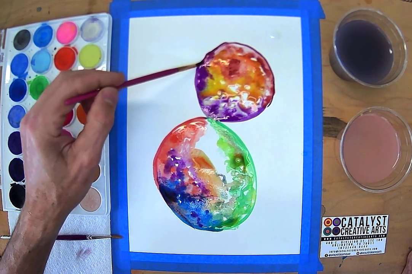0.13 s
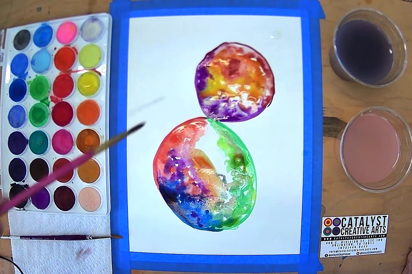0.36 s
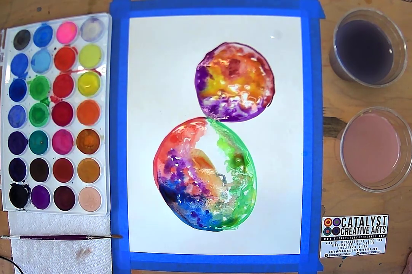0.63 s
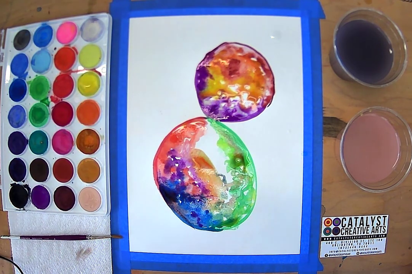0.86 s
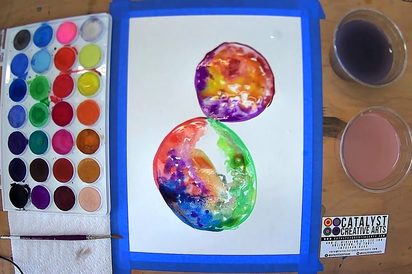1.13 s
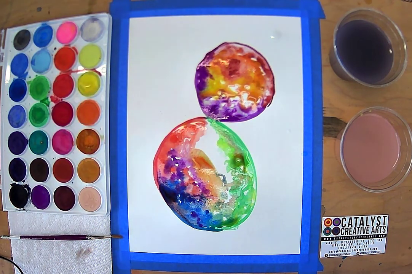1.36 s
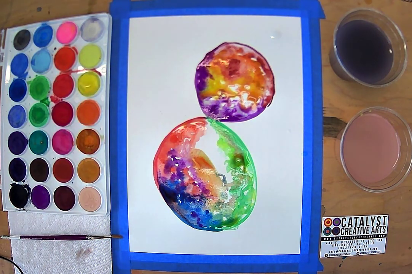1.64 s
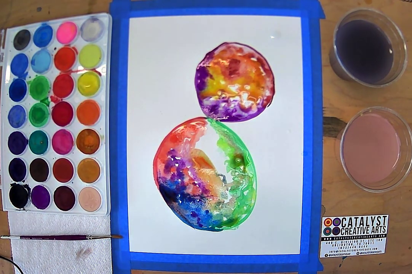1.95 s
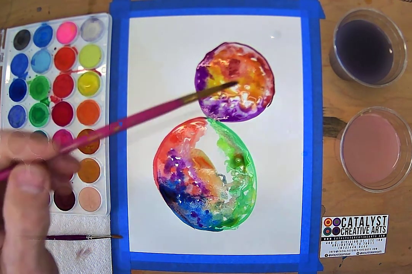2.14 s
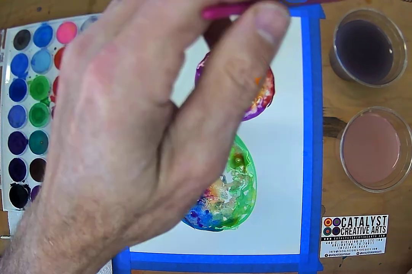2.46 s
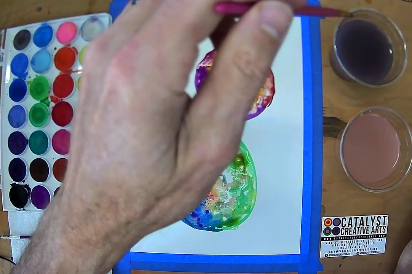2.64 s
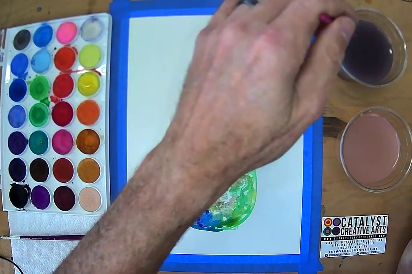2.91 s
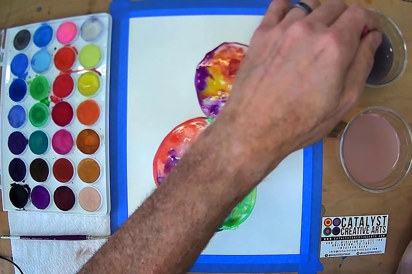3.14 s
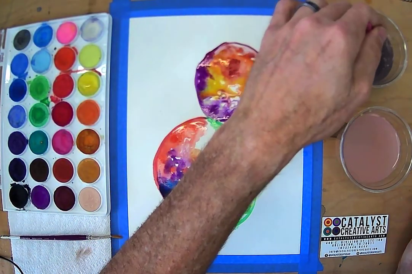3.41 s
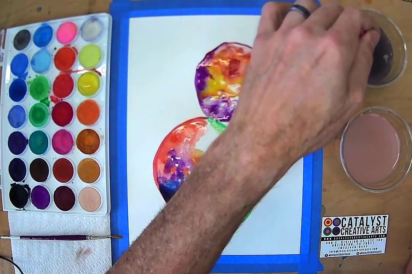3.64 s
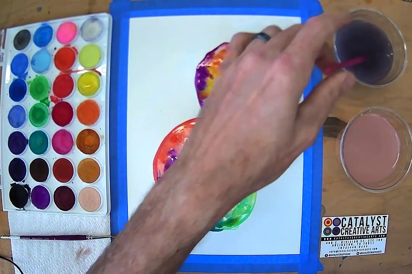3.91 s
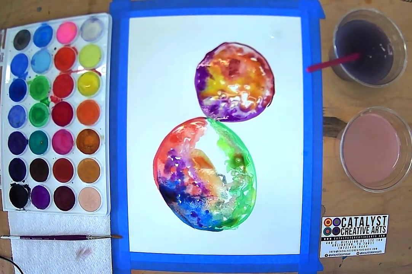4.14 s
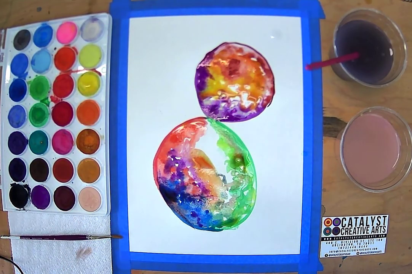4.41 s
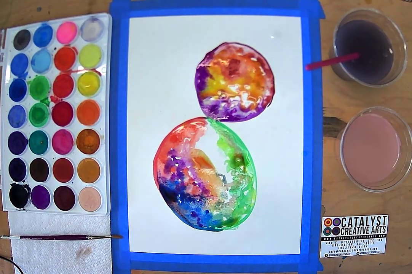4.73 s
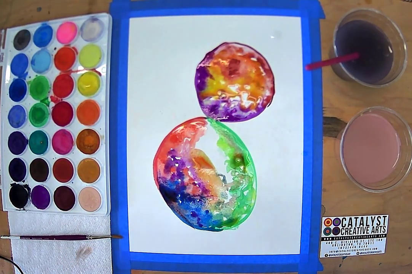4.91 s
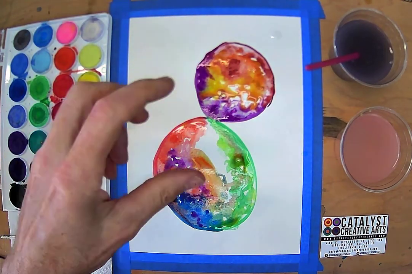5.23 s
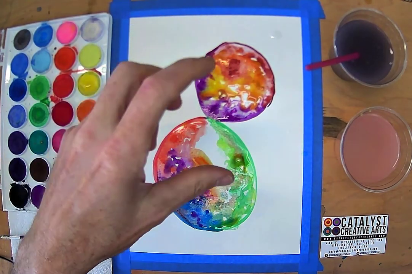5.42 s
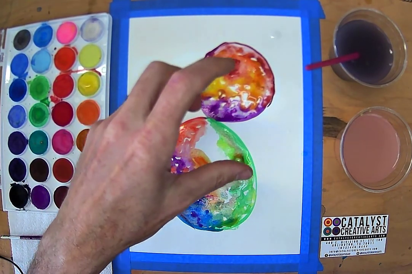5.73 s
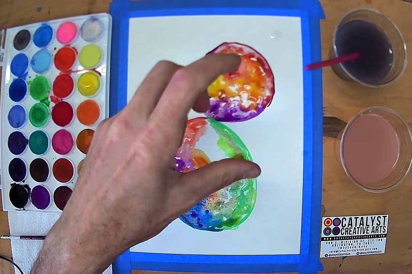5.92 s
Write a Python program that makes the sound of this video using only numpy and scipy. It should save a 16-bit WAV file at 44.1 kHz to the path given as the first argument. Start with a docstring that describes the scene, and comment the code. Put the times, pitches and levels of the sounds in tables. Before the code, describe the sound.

Paintbrush handles click and scrape on a wooden table, a brush rattles into a plastic cup, then a sharp knock, over a faint hum.

```python
"""A painter's table in a quiet room with a steady electrical hum. First, brush handles click and graze on
the wood; then something judders across it, sticking and slipping in short groans. A soft swish passes
amid the faint rustle of an arm. Near four seconds a brush drops into a plastic cup of water and rattles
on the rim, ringing the cup. Half a second later something hard is set down with a sharp knock and a small
bounce that thump the table. A low drone swells under the last faint rubs."""
import sys
import numpy as np
from scipy import signal
from scipy.fft import rfft, irfft, next_fast_len
from scipy.io import wavfile

SR = 44100
rng = np.random.default_rng(int(sys.argv[2]) if len(sys.argv) > 2 else 0)


def waveform_to_disk(signal):
    """Save audio, clipped to [-1, 1], as 16-bit WAV at the path in sys.argv[1]."""
    frames = np.transpose(np.atleast_2d(signal))
    scaled = np.clip(frames, -1, 1) * 32767
    samples = np.round(scaled).astype(np.int16)
    wavfile.write(sys.argv[1], SR, samples)


N = 267417


def knock(resonance_depth):
    """A hard thing hits the table and bounces once; the table answers with thumps and a hollow ring."""
    # Colours of the blow, the bounce and the hollow ring. Each row: frequency in Hz, level in dB.
    blow_colour = [(250, -22.5), (600, -21), (720, -17), (830, -6.5), (1500, -4.5), (2050, -9.5),
                   (3300, -9.5), (7600, -13), (8500, -23.5), (11300, -25), (12200, -23), (15000, -28.5),
                   (16500, -42)]
    bounce_colour = [(300, -32.5), (700, -25.5), (950, -10), (1800, -19.5), (2600, -10.5), (4200, -15.5),
                     (5000, -2), (6300, -6.5), (7000, -13.5), (8000, -10.5), (9000, -17), (10800, -20.5),
                     (11700, -7), (12800, -10.5), (13900, -17), (15300, -8), (16700, -29.5)]
    hollow_colour = [(700, -30), (830, -5), (910, 2.5), (1020, -7), (1300, -17.5), (1700, -6.5),
                     (2100, -27)]
    # The hard thing's peaks and dips. Each row: centre in Hz, width in Hz, lift in dB at full depth.
    full_resonances = [(884, 140, 5), (1003, 112, 5), (1210, 100, 5), (1570, 160, 4.5), (1691, 51, -12),
                       (1750, 100, 5.5), (1938, 70, -6), (2070, 70, -8.5), (2280, 210, 7.5),
                       (2440, 150, 9.5), (2870, 63, -0.5), (2990, 180, 4.5), (3240, 190, -4),
                       (3720, 530, 9), (4920, 200, 5), (5200, 100, -8), (5560, 220, 7), (6050, 240, 7.5),
                       (6930, 430, 8), (8100, 300, 5.5), (9480, 450, 10), (10560, 450, 5.5),
                       (11230, 350, -6.5)]
    # Two glancing touches, then the blow. Each row: start in seconds, level in dB, treble in dB.
    contacts = [(4.401, -37.5, -3), (4.402, -28.5, -16.5), (4.4044, -9.5, -1)]
    # The tabletop's modes. Each row: frequency in Hz, level in dB, t60 in seconds.
    table_modes = [(74.2, -3.5, 0.1), (122, -8, 0.19), (190, 0.5, 0.071), (314, -0.5, 0.038),
                   (405, -2, 0.036)]
    # Thumps under blow, bounce and settling. Each row: start in seconds, peak in dB, low cut in Hz.
    thumps = [(4.4051, -21.5, 25), (4.4342, -47, 25), (4.51, -47.5, 190)]
    out = from_db(-51) * stroke(4.48, rise_s=0.039, t60=0.15) * noise(hollow_colour, N)
    resonances = [(hz, width, resonance_depth * lift_db) for hz, width, lift_db in full_resonances]
    hit = high_pass(click(blow_colour, resonances), corner_hz=540)
    hit = unit_attack(crossings(hit, lags_s=[.00017, .00029, .00043, .00067]))
    for s, db, treble_db in contacts:
        add(out, s, from_db(db) * brighten(hit, treble_db, corner_hz=2500))
    bounce = crossings(click(bounce_colour, resonances), lags_s=[.00011, .00028, .00037])
    add(out, 4.4326, from_db(-25) * unit_attack(bounce))
    for s, db, low_cut_hz in thumps:
        thump = high_pass(ring(table_modes, longest_s=0.25, scatter_db=.5), low_cut_hz)
        add(out, s, from_db(db) * thump / np.abs(thump).max())
    return out


def cup():
    """The brush lands in the cup, then rubs down the rim in softer bounces."""
    # The rim rub, plus a faint high band near 8 kHz. Each row: frequency in Hz, level in dB.
    rub_colour = [(1500, -23), (3400, -1.5), (4000, -10), (4900, 5), (5800, -2), (6600, -6), (7400, -17.5),
                  (8100, -7.5), (8700, -23), (9400, -35), (14000, -37)]
    # Envelope of that rub. Each row: time in seconds, level in dB.
    rub_level = [(3.885, -78), (3.9, -53.5), (3.945, -65), (4.01, -65), (4.04, -68), (4.09, -80)]
    # The rattle. Each row: start in seconds, level in dB, treble in dB, crack against ring in dB.
    taps = [(3.8816, -28, 3.5, -0.5), (3.9015, -48, 6, 0), (3.952, -40, -8, -3.5), (3.965, -53, -9, -3),
            (3.981, -45.5, -5, -5), (3.992, -45, -20, -1), (4.005, -51, -4, -1)]
    out = level(rub_level) * noise(rub_colour, N) * from_db(2.3 * drift(200))
    for s, db, treble_db, crack_db in taps:
        add(out, s, from_db(db) * brighten(cup_tap(crack_db), treble_db, corner_hz=2470))
    return out


def cup_tap(crack_db):
    """One tap on the cup: ringing modes plus the crack of dense, damped ones, whose treble dies first."""
    # The cup's ring, plus a faint tone near 8 kHz. Each row: frequency in Hz, level in dB, t60 in seconds.
    partials = [(850, -1, 0.059), (934, -8, .045), (1132, 1.5, 0.093), (1330, -5.5, 0.038),
                (1455, -15, 0.038), (1856, -6, 0.031), (2020, -1, 0.02), (2120, -9, 0.037), (2480, -8, .02),
                (2570, -3, 0.022), (3165, -10, .018), (3660, -10, .017), (4610, -5, .018),
                (5480, -13, .018), (6720, -12, 0.018), (8180, -24, 0.016)]
    # The crack, plus a faint high band near 8 kHz. Each row: frequency in Hz, level in dB.
    crack_colour = [(400, -42), (620, -15), (850, -2), (1200, 3.5), (1620, -13), (2500, -9), (2850, -16),
                    (3400, -6.5), (4050, -27), (4700, -12), (5600, -13), (7000, -30), (7600, -35),
                    (8400, -19), (9300, -44), (14000, -71)]
    rise_s, treble_loss_db_per_s = 0.0009, 2500
    t = seconds(SR // 2)
    contact = 1 - np.exp(-(t / rise_s) ** 2)
    body = unit_attack(contact * ring(partials, longest_s=0.099, scatter_db=1.0))
    dense = brighten(noise(crack_colour, len(t)), -treble_loss_db_per_s * t, corner_hz=2000)
    crack = unit_attack(contact * dense * fade(t, t60=0.034))
    return unit_attack(body + from_db(crack_db) * crack)


def slide():
    """Something sticks and slips over the wood: short groans, a resonant scrape and table rumble."""
    # Short groans, then a faint lingering ring near 474 Hz.
    # Each row: middle in seconds, peak in dB, pitch in Hz, length in seconds.
    tones = [(1.232, -54, 587, .035), (1.343, -45, 495, 0.0096), (1.355, -32.5, 475, 0.028),
             (1.397, -37, 538, .011), (1.41, -33.5, 545, 0.0163), (1.419, -34, 534, 0.0132),
             (1.436, -37.5, 460, 0.0167), (1.466, -30.5, 475, 0.041), (1.487, -33.5, 525, 0.015),
             (1.499, -41.5, 577, 0.035), (1.51, -43, 670, 0.017), (1.551, -37.5, 520, 0.01015),
             (1.565, -44, 564, 0.018), (1.586, -45, 477, 0.0208), (1.625, -45, 477, 0.039),
             (1.652, -48, 579, .04), (1.77, -60, 474, 0.204)]
    # Resonances of the sliding thing. Each row: centre in Hz, width in Hz, level in dB.
    body = [(379, 33, -9), (472.8, 23, 7.5), (580, 32, 1.5), (663, 75, -6), (774, 66, -10), (956, 59, -17)]
    # The scrape brightens with speed. Each row: time in seconds, tilt in dB per octave.
    scrape_tilt = [(1.22, 7), (1.36, -3), (1.45, -3), (1.52, 6), (1.59, 6.5), (1.66, 4), (1.78, -3)]
    # A nudge, a pause, then a long push that rumbles at first. Each row: time in seconds, level in dB.
    scrape_level = [(1.19, -83), (1.23, -56), (1.285, -66), (1.35, -48.5), (1.39, -50.5), (1.49, -46.5),
                    (1.525, -51.5), (1.58, -49.5), (1.66, -54.5), (1.69, -65), (1.87, -80)]
    rumble_level = [(1.2, -75), (1.252, -69), (1.28, -50), (1.414, -47.5), (1.448, -61), (1.544, -61),
                    (1.568, -77), (1.7, -75)]
    # Colour of the table's rumble. Each row: frequency in Hz, level in dB.
    rumble_colour = [(20, -6), (50, -13), (105, 1.5), (160, -18.5), (240, -13.5), (400, -23)]
    pitched = np.zeros(N)
    for s, db, hz, length_s in tones:
        t = seconds(int(length_s * SR))
        window = np.sin(np.pi * t / length_s) ** 2
        add(pitched, s - length_s / 2, from_db(db) * window * np.sin(2 * np.pi * hz * t))
    friction = rng.standard_normal(N) * from_db(2.7 * drift(90))
    tilt_db, pivot_hz = curve(scrape_tilt), body[1][0]
    scrape = sum(from_db(db + tilt_db * np.log2(hz / pivot_hz)) * band_pass(friction, hz, width)
                 for hz, width, db in body)
    rumble = from_db(1) * level(rumble_level) * noise(rumble_colour, N)
    return pitched + level(scrape_level) * rms_one(scrape) + rumble


def handle_clicks():
    """A brush handle is laid on the table, then a thin one ticks; each contact excites its resonances."""
    # Colours of the two handles' clicks. Each row: frequency in Hz, level in dB.
    tap_colour = [(300, -36), (650, -24), (850, -12), (1400, 0), (2000, -3.5), (2550, -7), (3400, -2.5),
                  (3850, -15), (4200, -9), (5000, -7.5), (5600, -3.5), (6400, -11), (7200, -22),
                  (8500, -27.5), (11000, -64), (16000, -67)]
    tick_colour = [(500, -38), (1000, -23), (1300, -5), (1700, -5.5), (2250, -21), (2800, -11), (3650, -14),
                   (4100, -0.5), (5600, -2.5), (7400, -8), (8500, -24), (9300, -42), (15500, -50)]
    # Their peaks and dips. Each row: centre in Hz, width in Hz, lift in dB.
    tap_resonances = [(917, 71, 8), (1045, 100, 12.5), (1145, 82, -9), (1520, 120, 5.5), (1600, 45, -6),
                      (1690, 100, 7), (2150, 110, 5.5), (2380, 98, 6.5), (2530, 110, -10),
                      (2840, 170, 11.5), (3130, 150, -7), (3470, 210, 5.5), (3800, 140, -12),
                      (4230, 210, 8), (4460, 120, -12), (5200, 120, -2), (5620, 300, 2.5), (6800, 200, 1)]
    tick_resonances = [(1240, 130, 9.5), (1420, 130, 12), (1700, 120, 7), (4040, 240, 6), (4560, 200, 5),
                       (5000, 250, -3), (5360, 220, 9), (5700, 190, 11), (6150, 300, -13), (8200, 400, 9)]
    # Times that waves take to cross a handle, in seconds.
    lags_s = [.00021, .00039, .00059]
    # The first handle's taps. Each row: start in seconds, level in dB.
    taps = [(0.7159, -38), (0.718, -23), (0.744, -49), (0.7538, -60)]
    # The thin handle's ticks. Each row: start in seconds, level in dB, treble in dB.
    ticks = [(0.962, -52, -2), (0.9729, -37.5, 3), (0.9754, -34.5, -15), (0.979, -41.5, -3),
             (0.999, -56, 6), (1.0112, -55, 5)]
    out = np.zeros(N)
    tap = unit_attack(crossings(click(tap_colour, tap_resonances), lags_s))
    for s, db in taps:
        add(out, s, from_db(db) * tap)
    tick = crossings(click(tick_colour, tick_resonances), lags_s)
    for s, db, treble_db in ticks:
        add(out, s, from_db(db) * unit_attack(brighten(tick, treble_db, corner_hz=1500)))
    return out


def light_friction():
    """Light grainy friction: handle grazes early, a faint swish near the end."""
    # Three grazes, then the swish. Each row: time of the peak in seconds, level in dB, rise in seconds.
    strokes = [(0.718, -45.5, .012), (0.855, -61.5, 0.099), (1.02, -53.5, 0.063), (5.7, -72, 0.054)]
    # Their bright colour. Each row: frequency in Hz, level in dB.
    colour = [(1000, -30), (1600, -17), (2200, -22), (3500, -18), (4100, 0), (4700, -10), (5150, -8),
              (5900, -0.5), (6500, 4.5), (7600, -18), (9000, -44), (14000, -55)]
    envelope = sum(from_db(db) * stroke(s, rise_s, t60=0.18) for s, db, rise_s in strokes)
    return envelope * noise(colour, N) * from_db(2.4 * drift(250))


def squeaks():
    """Tiny rubs of bristles and handle, each a burst of friction in one narrow resonance."""
    # The rubs. Each row: start in seconds, level in dB, pitch in Hz, width in Hz, t60 in seconds.
    rubs = [(0.676, -54.5, 6200, 450, 0.059), (0.791, -46.5, 6220, 400, 0.046), (0.82, -55, 4670, 350, .09),
            (1.009, -53, 5840, 300, 0.28), (2.522, -58.5, 4480, 450, 0.11),
            (2.628, -45.5, 3970, 150, 0.052), (2.632, -57, 1470, 120, 0.06),
            (2.633, -52.5, 4780, 320, 0.055), (3.586, -59.5, 4500, 650, .08), (3.902, -46, 5000, 900, .025),
            (3.972, -55, 4500, 600, 0.022), (3.9805, -43, 4780, 600, .018), (5.068, -60, 4700, 300, 0.22),
            (5.07, -66, 5570, 700, .14), (5.064, -61, 6810, 500, 0.16), (5.66, -71, 4690, 250, .4)]
    out, t = np.zeros(N), seconds(SR // 4)
    attack = 1 - np.exp(-t / 0.0015)
    for s, db, hz, width, t60 in rubs:
        friction = rms_one(band_pass(rng.standard_normal(len(t)), hz, width))
        add(out, s, from_db(db) * attack * fade(t, t60) * friction)
    return out


def swish():
    """A soft, high swish of noise, made grainy by a fast flicker in level."""
    # Its envelope. Each row: time in seconds, level in dB.
    envelope = [(2.368, -92), (2.381, -43.5), (2.41, -46), (2.44, -65), (2.52, -64.5), (2.56, -92)]
    # Its colour. Each row: frequency in Hz, level in dB.
    colour = [(2500, -44), (3600, -11.5), (4300, -9), (4950, -36), (5600, 4), (6300, 6.5), (7100, -3),
              (8000, -36), (9200, -27), (10500, -55), (15000, -60)]
    return level(envelope) * noise(colour, N) * from_db(2.0 * drift(300))


def arm():
    """The moving arm rustles faintly over a dull brushing, strongest as it reaches across the table."""
    # Separate rustles. Each row: middle in seconds, level in dB, length in seconds.
    rustles = [(0.844, -63.5, 0.21), (1.038, -61.5, 0.36), (1.225, -69, 0.12), (1.343, -67.5, 1),
               (1.432, -69.5, 0.097), (1.97, -68.5, 0.52), (2.495, -64, 0.46), (3.584, -66, 0.084),
               (5.1, -75, .35), (5.715, -76, 0.24)]
    # Colours of the rustle and the brushing. Each row: frequency in Hz, level in dB.
    rustle_colour = [(600, -7), (1400, 6.5), (2200, 2.5), (3200, 8.5), (4600, -2.5), (5400, -1.5),
                     (6800, -3), (8200, -18), (12000, -28.5), (15000, -25)]
    brushing_colour = [(300, -20.5), (400, -6.5), (480, 1.5), (600, -4.5), (750, -5.5), (900, -3.5),
                       (1300, -6.5), (2200, -16.5), (3500, -35.5)]
    # Envelope of the brushing. Each row: time in seconds, level in dB.
    brushing_level = [(0.64, -78), (.8, -70.5), (1.9, -71), (2.52, -66.5), (2.9, -72.5), (4.2, -71),
                      (4.7, -74), (6.06, -71.5)]
    movement = sum(from_db(db) * swell(s, length_s) for s, db, length_s in rustles)
    rustle = movement * noise(rustle_colour, N) * from_db(1.0 * drift(80))
    return rustle + level(brushing_level) * noise(brushing_colour, N)


def room(x):
    """A small room's echoes build up quickly and die away in a dark tail and a bright one."""
    # Colours of the two tails. Each row: frequency in Hz, level in dB.
    dark = [(80, -4.5), (300, -3.5), (600, -0.5), (1000, -3), (1600, -1), (2400, -5.5), (3500, -8),
            (6000, -28), (16000, -59)]
    bright = [(1500, -30), (3200, -4), (5000, 7), (7000, 1), (9000, -2), (16000, -4.5)]
    t = seconds(SR // 2)
    build_up = 1 - np.exp(-(t / 0.0056) ** 2)
    response = 0
    for colour, t60, db in [(dark, 0.28, -21), (bright, 0.27, -23)]:
        tail = noise(colour, len(t)) * fade(t, t60) * build_up
        response = response + from_db(db) * tail / np.sqrt(np.sum(tail ** 2))
    return signal.fftconvolve(x, response)[:N]


def hum():
    """Steady hum tones; their overall level rises after the first click, then eases."""
    # The tones. Each row: frequency in Hz, base level in dB.
    tones = [(118.4, -69.5), (411.5, -69), (2552, -83), (2875, -86.5), (3020, -83), (3165, -83.5)]
    # Their overall level. Each row: time in seconds, gain in dB.
    gain = [(0, 1), (.55, -2), (1.0, 5), (1.8, 1), (3.2, -1), (4.3, 0.5), (6.06, 1)]
    chord = sum(from_db(db) * tone(hz, wander_hz=0.55, waver_db=-0.7) for hz, db in tones)
    return from_db(curve(gain)) * chord


def room_tone():
    """The quiet bed: a low rumble, a drone that comes and goes, and a steady hiss."""
    # Envelopes of the rumble and the drone. Each row: time in seconds, level in dB.
    rumble_level = [(0, -68.5), (.6, -69), (.75, -65.5), (1.1, -63), (2.0, -65), (3.6, -67.5), (4.0, -64.5),
                    (4.87, -67.5), (5.06, -62), (5.25, -68.5), (6.06, -64)]
    drone_level = [(0, -89), (2.0, -83), (2.5, -66), (3.0, -79.5), (4.0, -69), (4.87, -69), (4.97, -60),
                   (5.25, -69.5), (5.45, -62.5), (5.8, -61.5), (6.06, -65.5)]
    # Colours of the rumble and the hiss. Each row: frequency in Hz, level in dB.
    rumble_colour = [(15, -35.5), (30, -26.5), (55, -8.5), (85, -1.5), (125, -0.5), (230, 1.5), (350, -5),
                     (480, -12), (600, -29.5)]
    hiss_colour = [(300, -22), (450, -23), (560, -23.5), (720, -23.5), (900, -19.5), (1900, -25),
                   (3000, -15.5), (4400, -29), (6200, -31), (7500, -45.5), (10000, -53.5), (13000, -53.5),
                   (14500, -61), (17000, -66)]
    rumble = level(rumble_level) * noise(rumble_colour, N)
    drone = level(drone_level) * tone(hz=157.7, wander_hz=1.8, waver_db=2.0)
    hiss = from_db(-66) * noise(hiss_colour, N)
    return rumble + drone + hiss


def click(spectrum, resonances):
    """One clean contact: a broad colour shaped by damped resonances, starting at once."""
    size = SR // 5
    hz = np.maximum(np.fft.rfftfreq(size, 1 / SR), 1)
    points_hz, points_db = np.transpose(spectrum)
    colour_db = np.interp(np.log(hz), np.log(points_hz), points_db)
    resonance_db = sum(db / (1 + (2 * (hz - centre) / width) ** 2) for centre, width, db in resonances)
    # Minimum phase packs the energy into the attack.
    cepstrum = irfft(np.log(from_db(colour_db + resonance_db)))
    return irfft(np.exp(rfft(2 * cepstrum[:size // 2], size)))


def crossings(x, lags_s, reflected_share=.5):
    """Waves cross a hard body several times, which spreads a click over a millisecond or two."""
    for lag_s in lags_s:
        loop = np.r_[1, np.zeros(int(lag_s * SR)), -reflected_share]
        x = signal.lfilter(loop[::-1], loop, x)
    return x


def ring(modes, longest_s, scatter_db):
    """A struck body: neighbouring modes swing in opposite senses, with new strengths at each blow."""
    t = seconds(SR // 2)
    out = 0
    for k, (hz, db, t60) in enumerate(modes):
        strength = (-1) ** k * from_db(db + scatter_db * rng.standard_normal())
        out = out + strength * fade(t, min(t60, longest_s)) * np.sin(2 * np.pi * hz * t)
    return out


def tone(hz, wander_hz, waver_db):
    """A sine slightly unsteady in pitch and level, rms 1."""
    phase = 2 * np.pi * np.cumsum(hz + wander_hz * drift(8.7)) / SR
    return rms_one(np.sin(phase) * from_db(waver_db * drift(4.9)))


def noise(spectrum, size):
    """Noise of a given colour, empty outside its span, rms 1."""
    hz, db = np.transpose(spectrum)
    length = next_fast_len(size)
    bins = np.maximum(np.fft.rfftfreq(length, 1 / SR), 1)
    colour = from_db(np.interp(np.log(bins), np.log(hz), db, left=-120, right=-120))
    return rms_one(irfft(rfft(rng.standard_normal(length)) * colour, length)[:size])


def drift(rate_hz):
    """Smooth random wander, rms 1."""
    knots = rng.standard_normal(int(N / SR * rate_hz) + 2)
    return rms_one(np.interp(seconds(N) * rate_hz, np.arange(len(knots)), knots))


def brighten(x, treble_db, corner_hz):
    """A treble shelf: a harder contact excites more highs, a softer one fewer."""
    low = signal.sosfilt(signal.butter(1, corner_hz, fs=SR, output="sos"), x)
    return low + from_db(treble_db) * (x - low)


def high_pass(x, corner_hz):
    """Small objects radiate little below their lowest mode."""
    return signal.sosfilt(signal.butter(4, corner_hz, "high", fs=SR, output="sos"), x)


def band_pass(x, hz, width_hz):
    """One resonance picks out a narrow band."""
    edges = [hz - width_hz / 2, hz + width_hz / 2]
    return signal.sosfilt(signal.butter(2, edges, "band", fs=SR, output="sos"), x)


def curve(points):
    """Straight lines through (seconds, value) points, held at the ends."""
    return np.interp(seconds(N), *np.transpose(points))


def level(points):
    """A level curve as a gain, silent outside its span."""
    s, db = np.transpose(points)
    return from_db(np.interp(seconds(N), s, db, left=-140, right=-140))


def swell(s, length_s):
    """A smooth rise and fall around time s."""
    return np.cos(np.pi * np.clip((seconds(N) - s) / length_s, -.5, .5)) ** 2


def stroke(s, rise_s, t60):
    """An envelope that builds up until time s and then dies away."""
    t = seconds(N) - s
    return np.sin(np.pi / 2 * np.clip(1 + t / rise_s, 0, 1)) * fade(np.maximum(t, 0), t60)


def fade(t, t60):
    """Exponential decay, 60 dB down after t60 seconds."""
    return np.exp(-np.log(1000) * t / t60)


def unit_attack(x):
    """Scale so that the first three milliseconds have rms 1."""
    return x / np.sqrt(np.mean(x[:int(.003 * SR)] ** 2))


def rms_one(x):
    """Scale to unit rms."""
    return x / np.sqrt(np.mean(x ** 2) + 1e-20)


def from_db(db):
    """Decibels to gain."""
    return 10 ** (np.asarray(db) / 20)


def seconds(size):
    """Time axis."""
    return np.arange(size) / SR


def add(out, s, sound):
    """Mix a sound in at time s."""
    start = int(round(s * SR))
    out[start:start + len(sound)] += sound[:len(out) - start]


def scene():
    """Everything on the table, heard directly and through the room, over hum and room tone."""
    table = handle_clicks() + light_friction() + cup() + squeaks() + slide() + swish() + arm()
    # The room gathers the knock from all sides, which evens out its resonances.
    echoes = room(table + from_db(-5) * knock(resonance_depth=.5))
    direct = table + knock(resonance_depth=0.98)
    return (direct + echoes + hum() + room_tone())[None, :]


def record(dry):
    """The microphone loses the deepest bass, the loudest peak is rounded, and the top is cut steeply."""
    low_cut_hz, high_cut_hz, headroom = 42, 16700, .85
    thinned = signal.sosfilt(signal.butter(2, low_cut_hz, "high", fs=SR, output="sos"), dry)
    rounded = headroom * np.tanh(thinned / headroom)
    return signal.sosfilt(signal.ellip(10, .1, 80, high_cut_hz, fs=SR, output="sos"), rounded)


dry = scene()
out = record(dry)
waveform_to_disk(out)
```